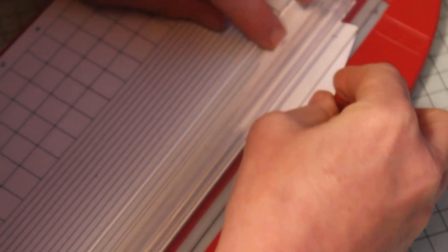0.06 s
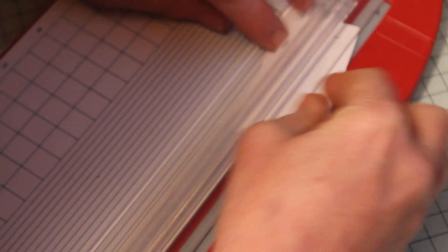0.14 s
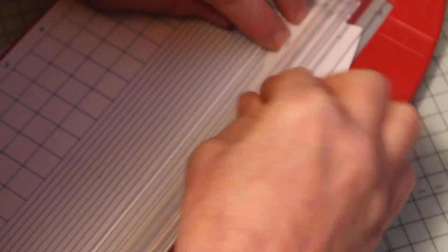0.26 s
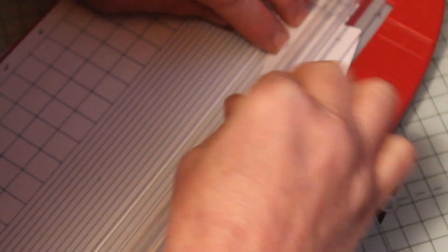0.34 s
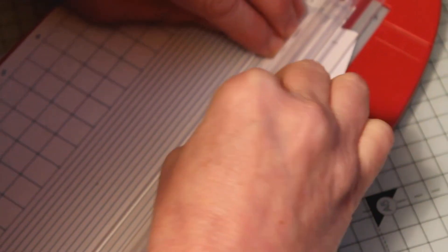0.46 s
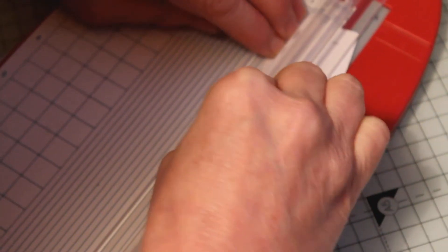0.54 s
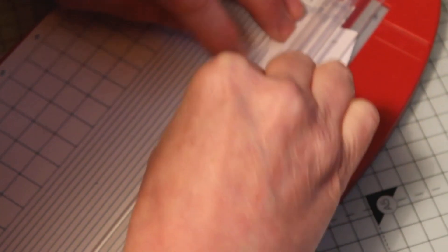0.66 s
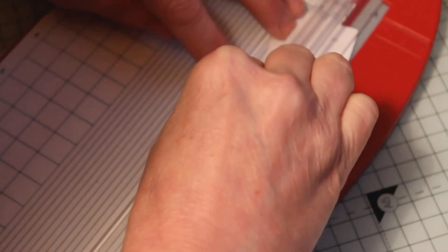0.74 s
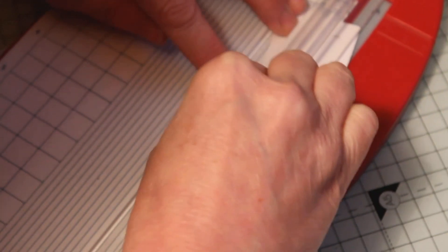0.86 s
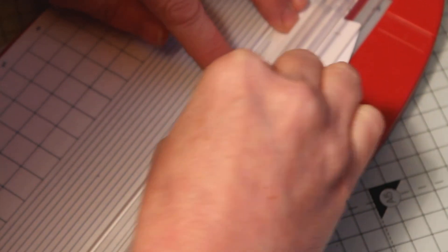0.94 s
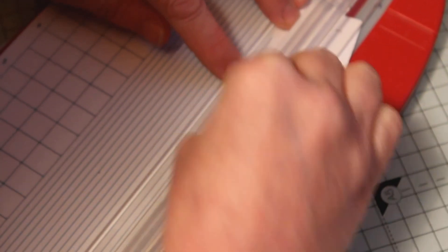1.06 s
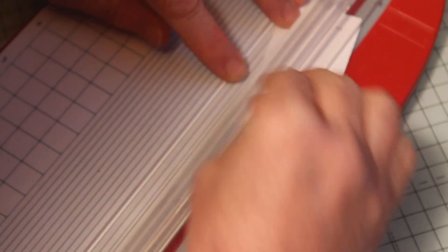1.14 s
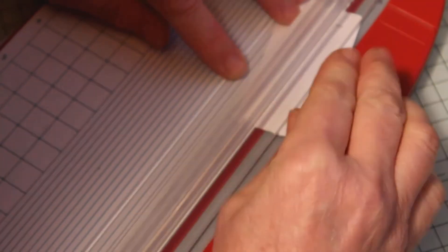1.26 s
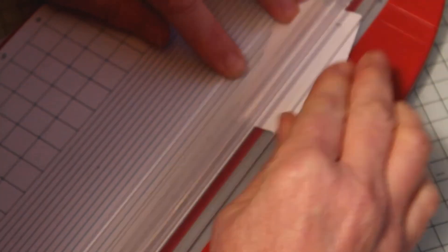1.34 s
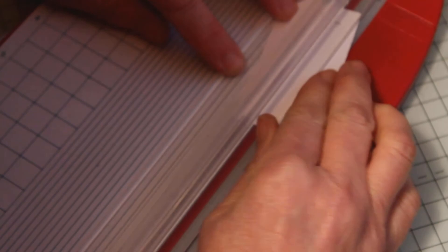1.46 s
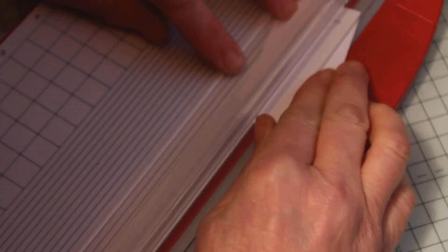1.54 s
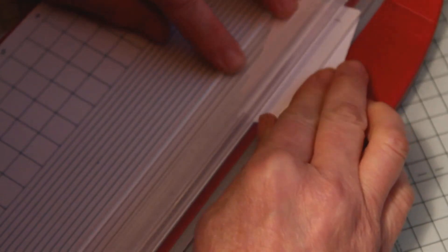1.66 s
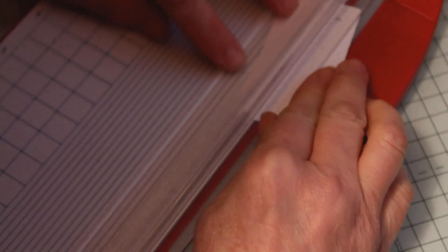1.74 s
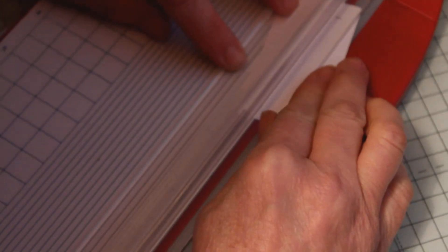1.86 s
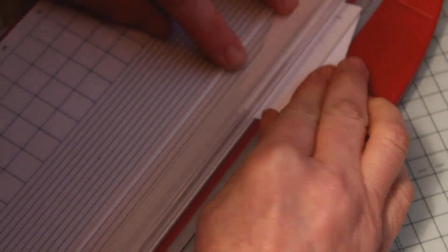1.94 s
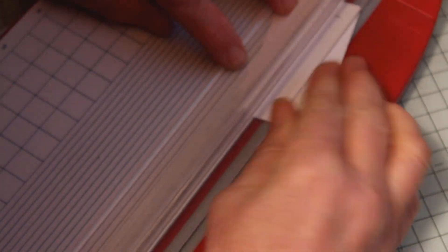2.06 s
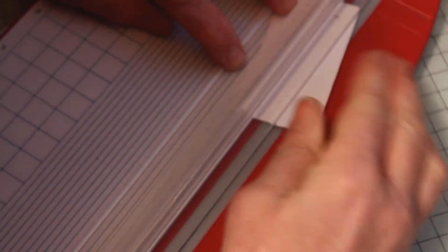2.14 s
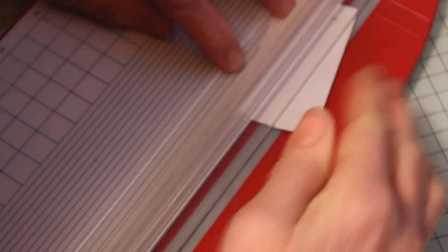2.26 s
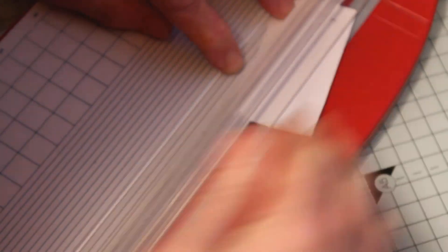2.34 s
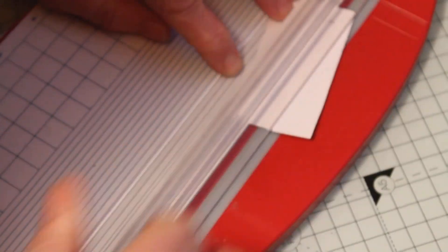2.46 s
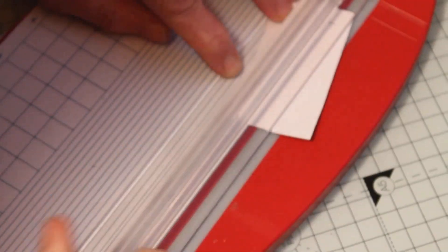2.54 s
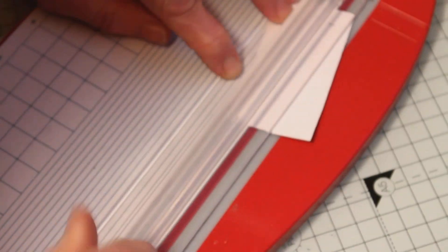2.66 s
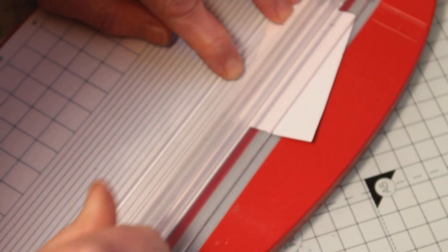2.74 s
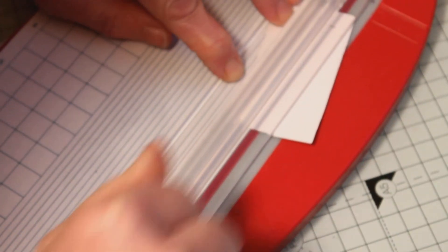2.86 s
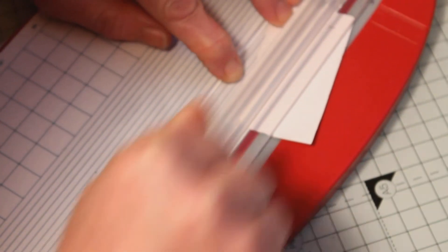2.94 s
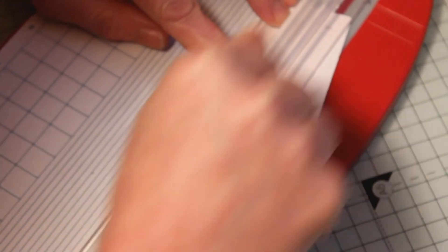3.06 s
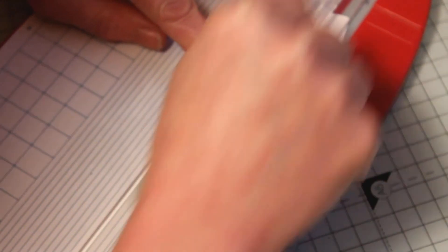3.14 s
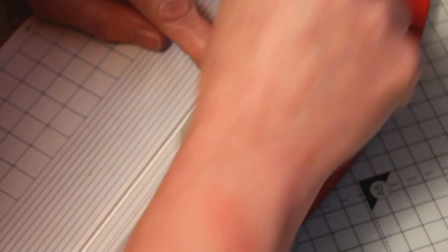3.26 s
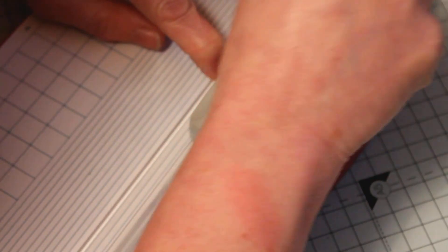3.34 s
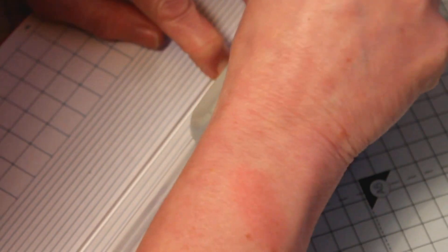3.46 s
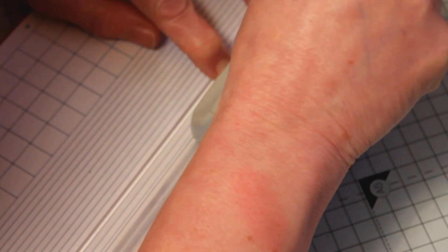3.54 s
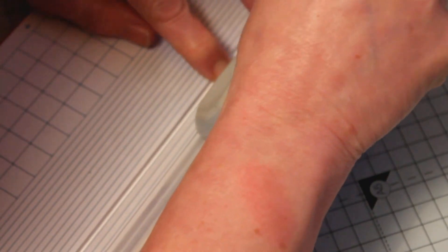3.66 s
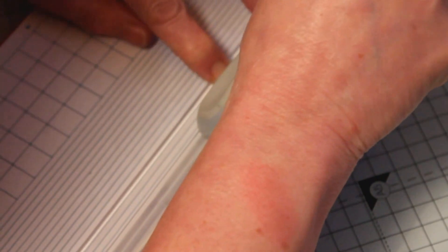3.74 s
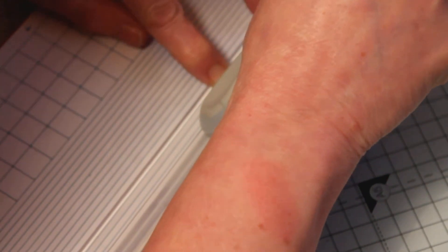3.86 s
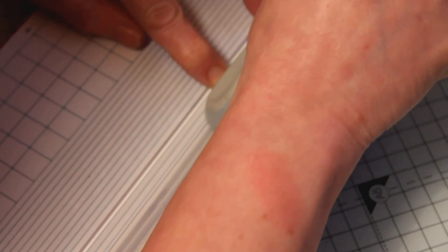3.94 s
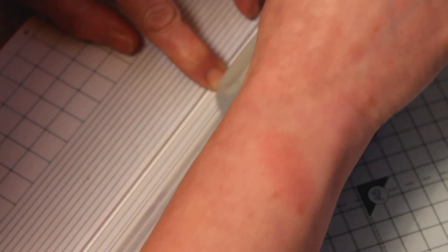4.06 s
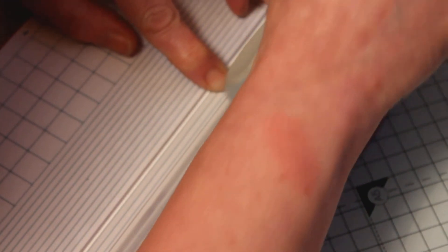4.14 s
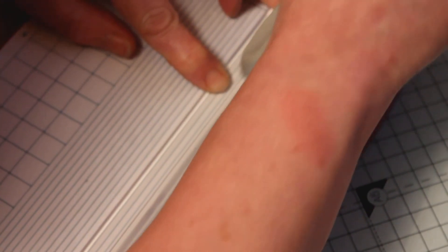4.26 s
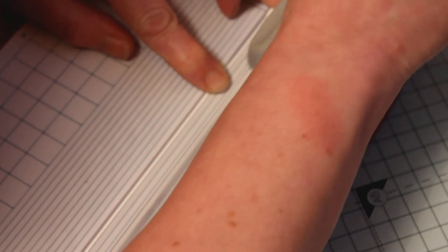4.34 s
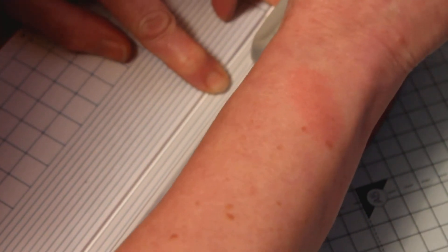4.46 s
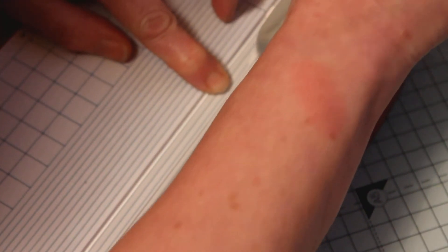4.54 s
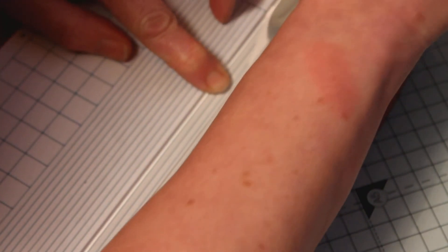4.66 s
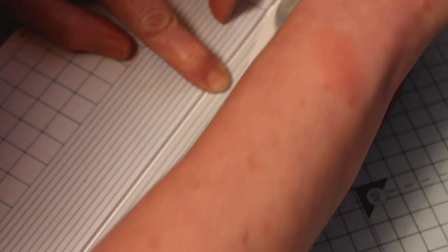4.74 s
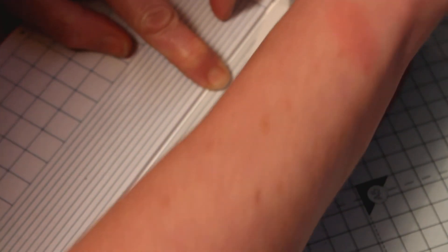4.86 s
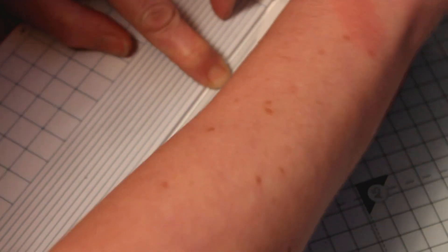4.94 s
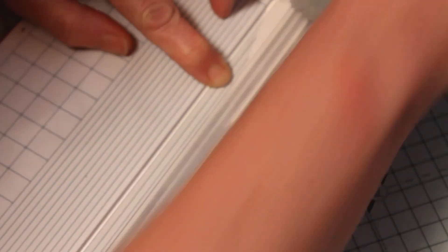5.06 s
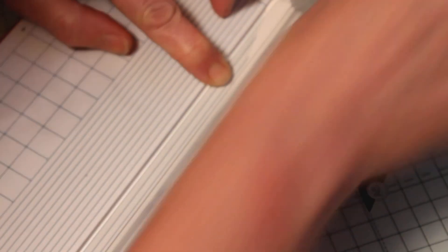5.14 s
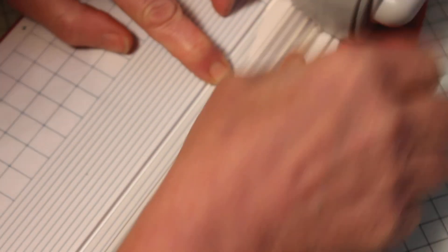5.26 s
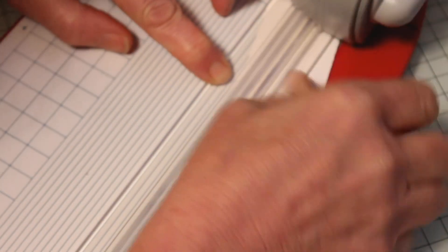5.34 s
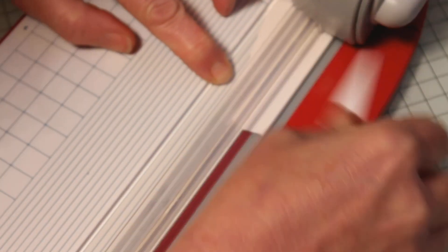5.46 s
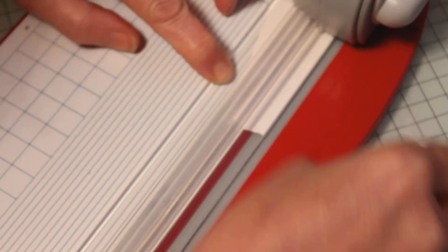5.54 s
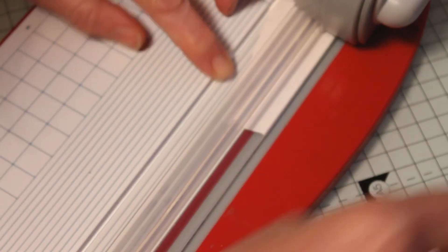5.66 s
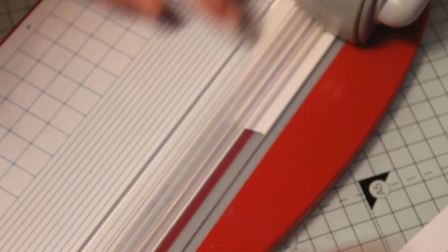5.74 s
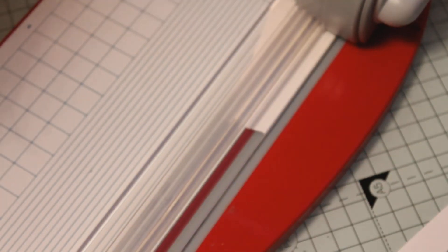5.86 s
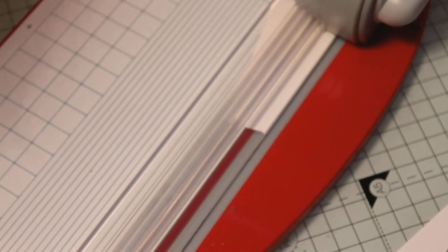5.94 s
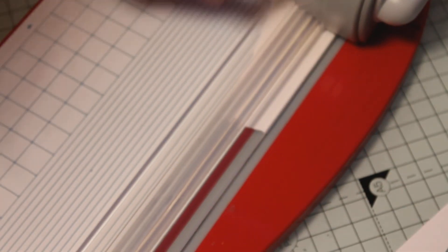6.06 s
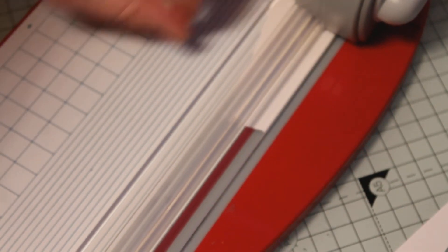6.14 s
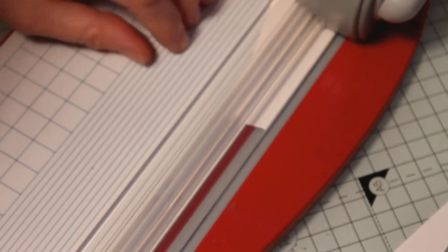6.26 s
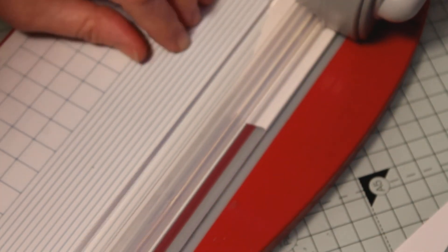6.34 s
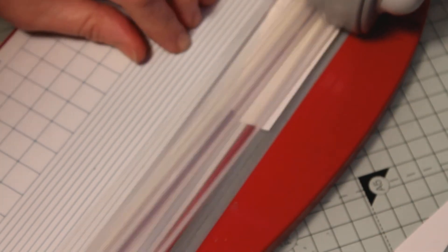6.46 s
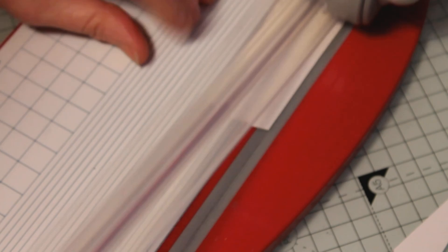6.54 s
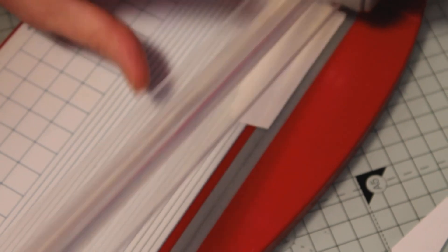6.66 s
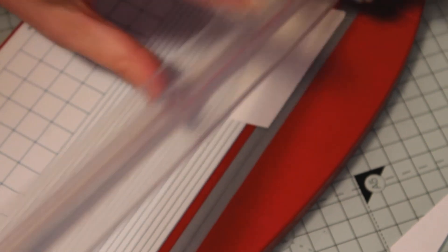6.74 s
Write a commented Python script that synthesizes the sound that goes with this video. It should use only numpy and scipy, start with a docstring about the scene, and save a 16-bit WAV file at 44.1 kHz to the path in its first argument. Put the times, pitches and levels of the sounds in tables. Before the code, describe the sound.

A paper trimmer on a desk, heard very close with a soft room murmur behind. Uneven plastic taps come first, some with dull desk thuds. A sharp clack precedes a brief low rolling slide, then bright ticks and a raspy scrape with a droning plastic resonance. Knocks and faint skin rubs return, fewer and softer, before a hard, bouncing, ringing clatter ends it.

```python
"""A quiet room murmur comes first, then clicks and knocks as fingers line up a card in a paper trimmer.
The carriage rolls up its rail, the blade scrapes through the card, and the guard flips open with a clatter.
Knocks, ticks and clatter are short noise bursts, some with ringing tones; sliding is made of many tiny slips.
Squeaks are rough sine tones. The plastic trimmer stands on a desk close to the microphone in a small room."""
import sys
import numpy as np
from scipy import signal
from scipy.fft import rfft, irfft, next_fast_len
from scipy.io import wavfile
from scipy.ndimage import map_coordinates

SR = 44100
rng = np.random.default_rng(int(sys.argv[2]) if len(sys.argv) > 2 else 0)


def dump_mix(stems):
    """Bounce the given channels to the path in sys.argv[1] as a 16-bit WAV at rate SR."""
    frames = np.atleast_2d(stems).T  # one column per channel
    limited = np.clip(frames, -1, 1)  # hard clip at full scale
    pcm = np.round(limited * 32767).astype(np.int16)
    wavfile.write(sys.argv[1], SR, pcm)


N = 300321  # length of the scene in samples

# In spectrum tables level_db is relative, per Hz. t60_s is the time to fade by 60 dB.
# room murmur and hiss: pitch_hz, level_db
AIR_SPECTRUM = [(12, -57), (20, -69), (53, -2.5), (81, -16.5), (116, -3), (177, -10.5), (241, -6),
                (285, -1), (499, -14.5), (718, -8.5), (802, -10.5), (1860, -17.5), (2670, -18.5),
                (2910, -19), (16000, -32)]
# how long the room rings: pitch_hz, t60_s
ROOM_FADE = [(120, 0.44), (500, 0.35), (3000, 0.43), (8000, 0.44), (15000, 0.14)]
# plastic contacts: start_s, level_db, weight_db (thud against 1.4 kHz), hardness_db (extra treble),
# ring pitch_hz, rise_s
KNOCK_EVENTS = [(0.1426, -40, -0.5, -3, 1276, 0.00045), (0.2643, -35.5, 11, 1.5, 606, 0.00036),
                (0.3479, -46.5, 1, 4.5, 1310, 0.00012), (0.539, -29.5, -3.5, -9, 894, 0.00012),
                (0.703, -41.5, 3.5, 2, 823, 0.000095), (0.817, -47, 13, 1.5, 900, 0.00023),
                (1.223, -47, 9.5, 0, 640, 0.00047), (1.266, -44, 1, 0, 637, 0.00018),
                (1.544, -51.5, 2, -1, 646, 0.0033), (2.123, -56.5, -7, 7, 1700, 0.0018),
                (2.174, -53.5, 4, 8, 1300, 0.0013), (2.191, -47.5, -12, 5, 650, 0.00013),
                (2.1958, -45.5, 5, 5.5, 724, 0.00016), (2.651, -38.5, 9, 4.5, 910, 0.0053),
                (2.801, -47, -2, -7, 1080, 0.0017), (2.8201, -25, -3.5, -2, 2050, 0.0026),
                (3.038, -31.5, -5, 5.5, 1190, 0.000073), (3.172, -42, 3, 9, 1100, .001),
                (3.226, -40.5, 4, 12, 1110, 0.0046), (3.409, -34.5, 0, -6, 895, 0.0028),
                (3.44, -37.5, -6, -10, 1056, .003), (4.737, -37, -6.5, -14, 795, .0001),
                (5.091, -42, 3, -1, 1030, 0.0026), (5.122, -41, 3, 9, 1090, .006),
                (5.135, -39, -5, -5, 940, 0.001), (5.147, -23.5, 4.5, 5.5, 1100, 0.00079),
                (5.156, -29, 10, 4, 706, 0.00026), (5.178, -36.5, 10, 5, 700, .002),
                (5.273, -38.5, 4, -7.5, 634, 0.0003), (5.3257, -28, -1.5, -4.5, 740, 0.00048),
                (5.373, -48, 15.5, 0, 736, .005), (5.424, -45, 5, -1, 667, 0.0017),
                (5.49, -46.5, 4, 12, 710, 0.000092), (5.743, -48.5, 9, -3, 780, 0.0028),
                (5.789, -35.5, -3.5, 6.5, 1967, 0.00057), (6.094, -33.5, 1.5, 3.5, 1307, 0.00097),
                (6.102, -36, 13, -5, 648, 0.00038), (6.272, -46.5, 11, 3, 870, 0.0098),
                (6.331, -39, 6, -6, 790, .0003), (6.432, -48.5, 7, -12, 2100, 0.0035)]
# the desk's boom: pitch_hz, level_db
DESK_SPECTRUM = [(30, -50), (62, -23), (95, -45), (118, -5.5), (129, -0.5), (140, -10.5), (165, -17.5),
                 (300, -50), (700, -86)]
# low sound of the trimmer's base and the rolling carriage: pitch_hz, level_db
RUMBLE_SPECTRUM = [(26, -50), (45, -5), (86, -15), (124, -6), (171, -8), (378, 1), (589, -11), (658, -1.5),
                   (701, -12.5), (948, -14), (2000, -37), (2600, -48), (4400, -120)]
# skin brushes over plastic: full_pressure_start_s, hold_s, level_db (relative)
RUB_PUSHES = [(.375, 0.022, -50.5), (1.49, .06, -59.5), (5.163, 0.0083, -35), (5.41, 0.095, -57),
              (5.58, 0.073, -48), (5.82, 0.015, -48.5), (6.01, 0.062, -59)]
# skin on plastic: pitch_hz, level_db
SKIN_SPECTRUM = [(410, -14), (700, 3.5), (830, -10), (910, -10.5), (1730, -5), (2190, -9), (3690, -10.5),
                 (5690, -12.5), (9110, -13), (16000, -32)]
# a fingertip slips on the plastic: middle_s, pitch_hz, level_db, half_length_s
SQUEAK_EVENTS = [(2.645, 1427, -48, 0.0065), (2.771, 1600, -48.5, 0.0057), (2.811, 1090, -41, .005),
                 (5.058, 1953, -47, .008), (5.127, 4740, -39, 0.005), (6.276, 2150, -49, .007)]
# pushes of the carriage along the rail: full_speed_start_s, hold_s, level_db (relative)
ROLL_PUSHES = [(2.91, 0.083, -44.5), (3.035, 0.33, -38), (3.42, 0.019, -39.5)]
# middle part of the rolling sound: pitch_hz, level_db
GRIND_SPECTRUM = [(300, -24), (800, 2.5), (2200, -2), (5000, -16), (10000, -40)]
# hiss of the rail: pitch_hz, level_db
RAIL_SPECTRUM = [(1470, -35), (2500, -6), (2770, -9), (3570, -7), (3860, -10), (5150, -10.5), (8870, -9.5),
                 (16000, -26)]
# the blade holder ticks in the carriage: start_s, level_db (relative)
TICK_EVENTS = [(3.5228, -39.5), (3.5454, -33), (3.7302, -27), (3.7349, -35), (3.9933, -34), (4.4204, -36),
               (4.9233, -43.5)]
# the blade holder: pitch_hz, level_db
HOLDER_SPECTRUM = [(300, -18), (900, -9), (2000, -7), (2700, 2.5), (3200, 8), (3800, -3.5), (4400, 5.5),
                   (5100, -14), (6300, -11.5), (9000, -16), (16000, -38)]
# pushes of the blade through the card: full_speed_start_s, hold_s, level_db (relative)
CUT_PUSHES = [(3.755, 0.006, -44), (4.07, 0.33, -40), (4.38, 0.024, -47), (4.675, 0.057, -42.5),
              (4.9, 0.091, -59.5)]
# resonances of the trimmer's bed: pitch_hz, width_hz, level_db
BED_RESONANCES = [(320, 71, 15), (830, 110, -14), (1100, 42, 25.5), (2090, 49, -7), (2700, 210, -9),
                  (3240, 47, 0), (3530, 24, 20), (4110, 30, -17), (4260, 43, -14)]
# low scrape of the blade: pitch_hz, level_db
SCRAPE_SPECTRUM = [(110, -38), (180, -18), (226, -32), (319, -3.5), (361, -14.5), (431, -5), (535, -13),
                   (832, 0), (906, -5), (1090, -12.5), (1700, -9), (2210, -33), (3740, -120)]
# rasp of the cut edge: pitch_hz, level_db
RASP_SPECTRUM = [(820, -28), (1400, -8), (1960, -5), (3080, -6.5), (3300, -9.5), (3560, -9), (5000, -15.5),
                 (6500, -28), (11000, -120)]
# card fibres parting: pitch_hz, level_db
FIBRE_SPECTRUM = [(2350, -6.5), (4000, -27), (4260, -5), (4620, -8.5), (6900, -4), (8960, -1.5),
                  (10400, -7.5), (12900, -11), (15000, -16), (16000, -21)]
# the guard strikes and rebounds: start_s, level_db, rise_s
CLATTER_EVENTS = [(6.481, -15, 0.00014), (6.488, -22.5, .00075), (6.5005, -16, 0.00039),
                  (6.506, -17.5, 0.0008), (6.529, -22, 0.0026), (6.5492, -13, 0.00038),
                  (6.558, -22, 0.0044), (6.59, -21, 0.0054)]
# crack of the guard: pitch_hz, level_db
GUARD_SPECTRUM = [(47, -53), (80, -38), (127, -12), (248, -15), (395, -6), (504, -13), (751, -1.5),
                  (937, -12.5), (1220, -1.5), (1400, -6), (2970, -6), (4420, -14), (7530, -19.5),
                  (16000, -40)]
# ringing tones of the guard: pitch_hz, level_db (before each strike's random strength),
# t60_s (before the hand damps them)
GUARD_TONES = [(281, 0, 0.2), (732, 6, 0.21), (1270, -4, 0.1), (1525, -9, 0.29), (2000, -7, 0.41),
               (2290, 0, 0.66), (2560, -14, 0.33), (2730, -15, 0.32), (3370, -21, 0.46), (3500, -14, 0.65),
               (4791, -12, 0.61), (4900, -13, 0.71), (5430, -17, 0.47), (5530, -10, 0.4)]

AIR_DB = -55.5
CHATTER_S, CHATTER_PER_RISE = 0.03, 10.2  # t60: a sharp contact dies at once; a sliding one chatters longer
BODY_DB, BODY_PER_WEIGHT, BODY_DB_PER_OCTAVE = 4, .4, -6  # heavy blows on low-ringing parts sound hollow
EDGE_DB, TICK_DB = -8.5, -16  # at 3 and 9 kHz, before hardness and rise time
TICK_DB_PER_DOUBLING = -1.5  # each doubling of the rise time takes off some of the top
RING_PER_WEIGHT, RING_DB_PER_OCTAVE = -0.29, 2.5  # a heavy hand damps the ring; small stiff parts ring clearly
BOOM_DB, BOOM_PER_WEIGHT = -17.5, 1  # how much of a blow reaches the desk
SHUDDER_DB = -5  # the trimmer's base, against the desk's boom
RAIL_BRIGHTENS_DB_PER_S = 9.5  # the hiss gains from the first push on
CUT_BRIGHTENS_DB_PER_S = 6  # rasp and tearing gain from the first push on
GUARD_TILT_DB, GUARD_DULLS_DB_PER_S = 2, 26.5  # treble tilt per octave at first strike; later ones are duller
RATTLE_S, RATTLE_PER_RISE = 0.015, 38.5  # t60: glancing strikes rattle longer
TOP_HZ = 15950  # upper band limit


def amp(db):
    """Decibels to gain."""
    return 10 ** (np.asarray(db) / 20)


def unit(x):
    """x scaled to an average strength (rms) of 1."""
    return x / np.sqrt(np.mean(x ** 2) + 1e-20)


def along(points, hz):
    """Read (pitch, value) points on a logarithmic pitch axis."""
    pitches, values = np.transpose(points)
    return np.interp(np.log(hz + 1), np.log(pitches), values)


def filtered(x, response):
    """x with each frequency multiplied by response(frequency)."""
    size = next_fast_len(len(x) + SR // 2)
    spectrum = rfft(x, size) * response(np.fft.rfftfreq(size, 1 / SR))
    return irfft(spectrum, size)[:len(x)]


def coloured(x, spectrum, tilt_db=0, size=4096):
    """x through a filter of this spectrum, tilted per octave, that never sounds before its input."""
    hz = np.fft.rfftfreq(size, 1 / SR)
    gain = amp(along(spectrum, hz) + tilt_db * np.log2(hz / 2000 + .1))
    # folding the cepstrum puts the filter's energy as early as possible
    cepstrum = irfft(np.log(np.maximum(gain / gain.max(), 1e-4)))
    cepstrum[1:size // 2] *= 2
    cepstrum[size // 2 + 1:] = 0
    impulse = irfft(np.exp(rfft(cepstrum)))
    return signal.fftconvolve(x, impulse)[:len(x)]


def add(track, s, sound):
    """Mix a sound into the track at s seconds."""
    rest = track[round(s * SR):]
    rest[:len(sound)] += sound[:len(rest)]


def burst(x):
    """x with the energy of 25 ms at rms 1."""
    return x * np.sqrt(.025 * SR / (np.sum(x ** 2) + 1e-20))


def age():
    """Time since a blow, for half a second."""
    return np.arange(SR // 2) / SR


def wobble(rate):
    """A smooth random curve with rate random points a second."""
    knots = rng.standard_normal(int(N * rate / SR) + 4)
    return map_coordinates(knots, [np.arange(N) * rate / SR])


def effort(pushes, attack_db_per_s, release_db_per_s, swell_db_per_s=0):
    """Gain of a hand's pushes: each builds up, swells or sags while it is held, and lets go."""
    t = np.arange(N) / SR
    total = 0
    for s, hold, db in pushes:
        held = swell_db_per_s * np.clip(t - s, 0, hold)
        before = abs(attack_db_per_s) * np.maximum(s - t, 0)
        after = abs(release_db_per_s) * np.maximum(t - s - hold, 0)
        total = total + amp(db + held - before - after)
    return total


def travel(pushes):
    """Seconds since the first push, stopping at the end of the last."""
    first, last = pushes[0][0], pushes[-1][0] + pushes[-1][1]
    return np.clip(np.arange(N) / SR, first, last) - first


def blow(t60, rise, snap=0.2, uneven_db=4.5):
    """Plastic chatters unevenly and dies fast; a sharp contact starts with a snap, a sliding one swells."""
    t = age()
    rise = max(rise, 1e-4)
    flutter = np.interp(t, np.linspace(0, .5, num=250), rng.standard_normal(size=250))
    level = amp(uneven_db * flutter - 60 * t / max(t60, .005))
    chatter = rng.standard_normal(len(t)) * level * (1 - np.exp(-t / rise))
    click = burst(1. * (t == 0))  # a single sample
    return burst(chatter) + snap * np.exp(-rise / 0.0011) * click


def bed_response(hz):
    """The trimmer's bed resonates at several pitches; neighbours have opposite signs."""
    total = 0
    for k, (centre, width, db) in enumerate(BED_RESONANCES):
        peak = 1j * hz * width / (centre * centre - hz * hz + 1j * hz * width)
        total = total + (-1) ** k * amp(db) * peak
    return total


def friction(spectrum, rate, spread_db, bed_share=0):
    """Tiny slips of uneven size, rate a second, partly sounding through the bed's resonances."""
    happens = rng.random(N) < rate / SR
    slips = happens * rng.standard_normal(N) * amp(spread_db * rng.standard_normal(N))
    direct = unit(filtered(slips, lambda hz: amp(along(spectrum, hz))))
    if not bed_share:
        return direct
    return unit(direct + bed_share * unit(filtered(direct, bed_response)))


def air(level_db=0):
    """Steady room murmur and microphone hiss, made of shaped noise."""
    noise = rng.standard_normal(N)
    return amp(AIR_DB + level_db) * unit(filtered(noise, lambda hz: amp(along(AIR_SPECTRUM, hz))))


def room(x, early_db=-8, tail_db=-9, gap=0.0023):
    """Nearby surfaces answer within 16 ms while a tail dies away; each call draws its own echoes."""
    hz, _, noise = signal.stft(rng.standard_normal(SR // 2), SR, nperseg=256)
    t = np.arange(noise.shape[1]) * 128 / SR  # time of each frame
    fading = noise * amp(-60 * t / along(ROOM_FADE, hz)[:, None])
    tail = signal.istft(fading, SR, nperseg=256)[1][:SR // 2]
    tail *= np.clip(age() / gap - 1, 0, 1)
    early = np.zeros(len(tail))
    early[(rng.uniform(.002, .016, size=24) * SR).astype(int)] = rng.standard_normal(size=24)
    answer = amp(early_db) * early / np.linalg.norm(early) + amp(tail_db) * tail / np.linalg.norm(tail)
    return x + signal.fftconvolve(x, answer)[:len(x)]


def boom(t60=0.13, rise=0.013):
    """The desk answers a blow with a low, slowly building thud."""
    return burst(coloured(blow(t60, rise), DESK_SPECTRUM))


def knocks(level_db=0, ring_db=-6.5, ring_t60=0.035, blur=0.073):
    """Weight gives a contact its thud and shakes base and desk, hardness its treble; each spot rings."""
    out, t = np.zeros(N), age()
    for s, db, weight, hardness, ring_hz, rise in KNOCK_EVENTS:
        octaves = np.log2(ring_hz / 800)
        body = BODY_DB + BODY_PER_WEIGHT * weight + BODY_DB_PER_OCTAVE * octaves
        edge = EDGE_DB + 0.6 * hardness
        tick = TICK_DB + hardness + TICK_DB_PER_DOUBLING * np.log2(max(rise, 1e-4) / 0.00028)
        colour = [(35, weight - 22), (70, weight - 7), (200, weight - 6), (310, weight + 1),
                  (480, weight - 5), (720, body), (1400, 0), (3000, edge),
                  (9000, tick), (11000, tick - 10), (15000, tick - 14)]
        crack = burst(coloured(blow(CHATTER_S + CHATTER_PER_RISE * rise, rise), colour))
        # loose parts blur the pitch
        phase = 2 * np.pi * ring_hz * t + blur * np.cumsum(rng.standard_normal(len(t)))
        ring = burst(np.sin(phase) * amp(-60 * t / ring_t60) * (1 - np.exp(-t / max(rise, 1e-4))))
        clarity = amp(ring_db + RING_PER_WEIGHT * weight + RING_DB_PER_OCTAVE * octaves)
        contact = room(burst(crack + clarity * ring))
        shudder = amp(SHUDDER_DB) * burst(coloured(blow(0.24, rise=0.026), RUMBLE_SPECTRUM))
        thud = amp(BOOM_DB + BOOM_PER_WEIGHT * weight) * (boom() + shudder)
        add(out, s, amp(db + level_db) * (contact + thud))
    return out


def fingers(level_db=-1):
    """Fingertips brush over guard and card in many tiny slips."""
    pressure = effort(RUB_PUSHES, attack_db_per_s=290, release_db_per_s=380)
    return amp(level_db) * pressure * friction(SKIN_SPECTRUM, rate=12000, spread_db=5.5)


def squeaks(level_db=0, blur=0.13):
    """Skin sticks and slips for a moment, with a rough, uncertain pitch."""
    out, t = np.zeros(N), np.arange(N) / SR
    for s, hz, db, half_length in SQUEAK_EVENTS:
        near = np.abs(t - s) < .05
        phase = 2 * np.pi * hz * t[near] + blur * np.cumsum(rng.standard_normal(near.sum()))
        swell = np.exp(-((t[near] - s) / half_length) ** 2)
        out[near] += amp(db + level_db) * swell * unit(np.sin(phase))
    return out


def carriage(rumble_db=-1, grind_db=-8, hiss_db=-15, bumps_db=-8.0, judder_db=2):
    """The unloaded carriage judders up the rail, slowing a little during each push."""
    speed = effort(ROLL_PUSHES, attack_db_per_s=298, release_db_per_s=266, swell_db_per_s=-18.5)
    bright_db = RAIL_BRIGHTENS_DB_PER_S * travel(ROLL_PUSHES)
    rumble = amp(rumble_db) * friction(RUMBLE_SPECTRUM, rate=2300, spread_db=3.0)
    grind = amp(grind_db) * friction(GRIND_SPECTRUM, rate=2500, spread_db=3)
    hiss = amp(hiss_db + bright_db) * friction(RAIL_SPECTRUM, rate=11000, spread_db=-2.0)
    # rough spots in the rail shake the desk
    bumps = amp(bumps_db) * friction(DESK_SPECTRUM, rate=150, spread_db=3.5)
    return speed * (rumble + grind + hiss + bumps) * amp(judder_db * wobble(45))


def ticks(level_db=-9):
    """The blade holder rocks in its seat as it is pressed down, giving short clicks."""
    out = np.zeros(N)
    for s, db in TICK_EVENTS:
        click = burst(coloured(blow(0.023, rise=0.00027), HOLDER_SPECTRUM))
        add(out, s, amp(db + level_db) * room(click, tail_db=-10))
    return out


def blade(scrape_db=-2, rasp_db=-10, fibres_db=-14, bumps_db=-23, catch_db=2.0, uneven_db=1.65):
    """The blade drags through the card: the bed drones, the cut edge rasps and fibres part with a hiss."""
    speed = effort(CUT_PUSHES, attack_db_per_s=140, release_db_per_s=148, swell_db_per_s=-3.5)
    bright_db = CUT_BRIGHTENS_DB_PER_S * travel(CUT_PUSHES)
    scrape = amp(scrape_db) * friction(SCRAPE_SPECTRUM, rate=5000, spread_db=2, bed_share=0.41)
    rasp_gain = amp(rasp_db + bright_db + uneven_db * wobble(35))
    rasp = rasp_gain * friction(RASP_SPECTRUM, rate=5000, spread_db=0.5, bed_share=0.35)
    fibre_gain = amp(fibres_db + bright_db + uneven_db * wobble(25.2))
    fibres = fibre_gain * friction(FIBRE_SPECTRUM, rate=10000, spread_db=5.0)
    bumps = amp(bumps_db) * friction(DESK_SPECTRUM, rate=120, spread_db=-2)
    return speed * (scrape + rasp + fibres + bumps) * amp(catch_db * wobble(70))


def guard(ring_db=-13, boom_db=-16):
    """The long guard bounces on its hinge; every strike rings its tones anew and shakes the desk."""
    out, t = np.zeros(N), age()
    hand = amp(-60 * t / .6)  # the lifting hand damps the ring
    for s, db, rise in CLATTER_EVENTS:
        tilt_db = GUARD_TILT_DB - GUARD_DULLS_DB_PER_S * (s - CLATTER_EVENTS[0][0])
        crack = burst(coloured(blow(RATTLE_S + RATTLE_PER_RISE * rise, rise), GUARD_SPECTRUM, tilt_db))
        ring = np.zeros(len(t))
        for hz, level, t60 in GUARD_TONES:
            strength = rng.standard_normal()
            ring += strength * amp(level - 60 * t / t60) * np.sin(2 * np.pi * hz * t)
        strike = crack + amp(ring_db) * burst(ring * hand)
        thud = amp(boom_db) * boom(t60=0.11, rise=0.023)
        add(out, s, amp(db) * (room(strike, tail_db=-6.5) + thud))
    return out


def scene():
    """The trimmer in its room, as one channel."""
    sliding = carriage() + blade() + fingers() + squeaks()
    return (knocks() + ticks() + guard() + room(sliding, early_db=-3.5) + air())[None]


def band_limit(hz):
    """Gain that falls to nothing over 200 Hz around the top of the band."""
    return np.clip((TOP_HZ - hz) / 200 + .5, 0, 1)


def record(dry, low_cut_hz=45):
    """The recorder thins the deepest bass, rounds off peaks near full scale and cuts the highest treble."""
    low_cut = signal.butter(2, low_cut_hz, "high", fs=SR, output="sos")
    thinned = signal.sosfilt(low_cut, dry)
    rounded = thinned / (1 + np.abs(thinned) ** 6) ** (1 / 6)
    return np.array([filtered(channel, band_limit) for channel in rounded])


dry = scene()
out = record(dry)
dump_mix(out)
```